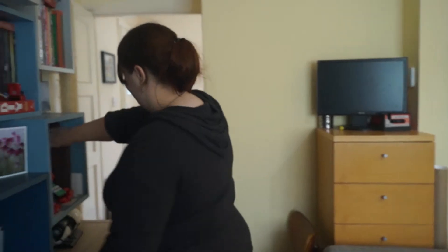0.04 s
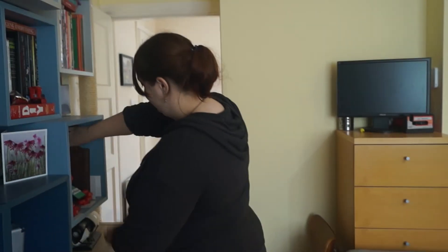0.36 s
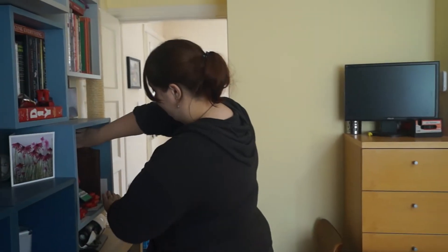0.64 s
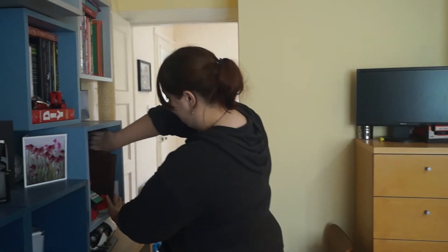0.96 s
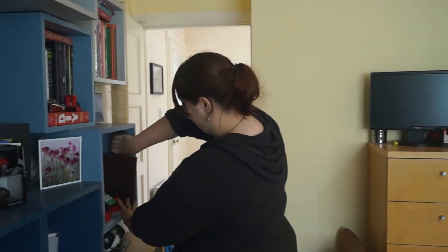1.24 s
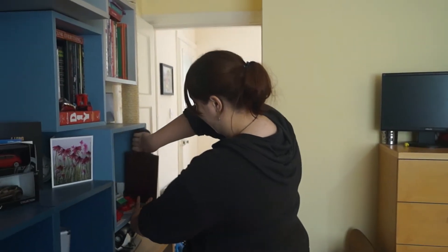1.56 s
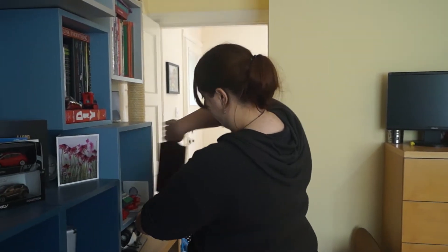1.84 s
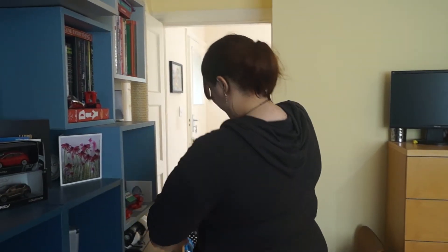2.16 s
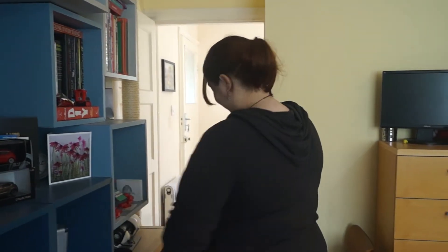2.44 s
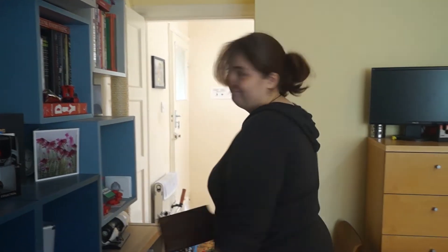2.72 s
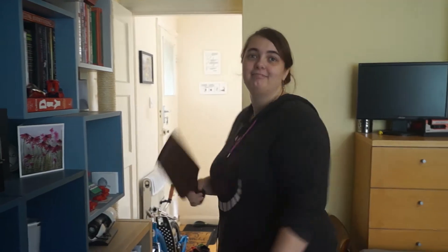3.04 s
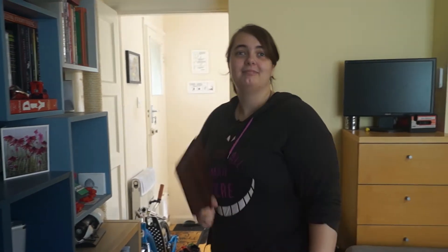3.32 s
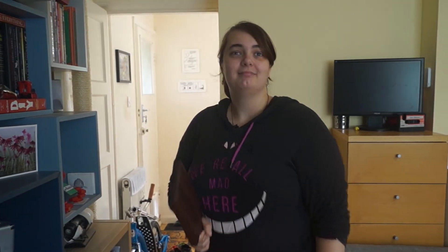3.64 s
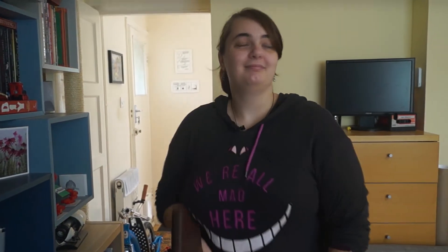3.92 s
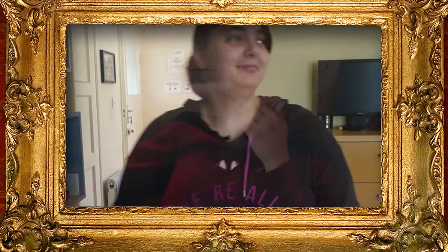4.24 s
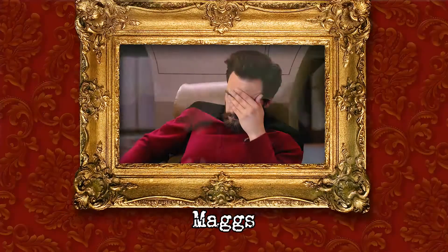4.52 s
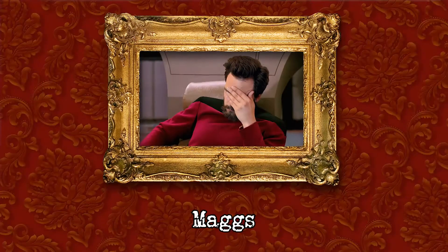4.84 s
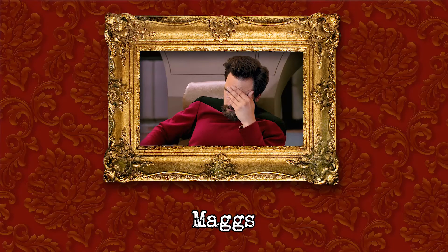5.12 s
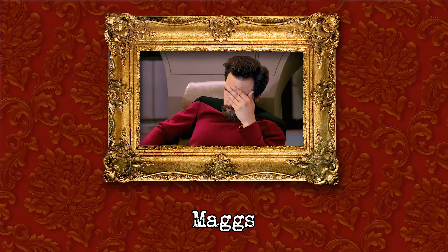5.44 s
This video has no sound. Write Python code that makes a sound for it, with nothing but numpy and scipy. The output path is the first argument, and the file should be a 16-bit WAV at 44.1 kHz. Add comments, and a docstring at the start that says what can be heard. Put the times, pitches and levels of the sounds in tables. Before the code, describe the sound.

A flat wooden box scrapes inside a shelf, tapping and brushing the boards, then gives two louder, chattering knocks. A faint rumble and hiss come up as the box rubs along the side. It slides over the front edge and catches three times, with more knocks and shuffles between. A few faint taps end it. The microphone is a few metres away in a small room.

```python
"""A small room, the microphone a few metres from a shelf. A flat wooden box scrapes deep in the shelf,
taps and brushes the boards, then knocks and chatters as it is worked out. A low rumble and hiss come up,
and the box rubs along the side wall. It slides over the front edge and catches; the same slide sounds
three times, with knocks and shuffles between. A few faint taps come last as the room noise fades away."""
import sys
import numpy as np
from scipy import signal
from scipy.fft import rfft, irfft, next_fast_len
from scipy.io import wavfile
from scipy.ndimage import uniform_filter1d

SR = 44100
rng = np.random.default_rng(int(sys.argv[2]) if len(sys.argv) > 2 else 0)


def bounce(signal):
    """Save signal as a 16-bit WAV file at the path given by the first command-line argument."""
    frames = np.transpose(np.atleast_2d(signal))
    limited = np.clip(frames, -1, 1)
    pcm = np.round(limited * 32767).astype(np.int16)
    wavfile.write(sys.argv[1], SR, pcm)


N = 250430
T = np.arange(N) / SR
REPEAT_S = 1.4  # time between repeats of the slides, catches, shuffles and swells of hiss

# box against shelf: start_s, level_db, contact_ms, crack_relative_db
KNOCKS = [(0.2332, -28.5, 0.88, -14.5), (1.0051, -14.5, 1.51, -16), (1.2869, -16, 1.19, -14.5),
          (1.396, -38.5, 1.6, -13.5), (2.687, -23, 1.29, -13), (3.805, -27.5, 1.4, -17.5),
          (4.087, -20.5, 1.35, -12.5)]
# rebounds within each knock: delay_s, gain_db
CHATTER = [(0, 2.5), (.0041, -4), (.0083, -16)]
# modes of box and board: pitch_hz, level_db, t60_s
WOOD_MODES = [(140.7, -26, 0.34), (260, -7, 0.029), (292.4, -26, .15), (321, -20.5, 0.13),
              (477, -3.5, 0.021), (621, -22, 0.2), (719, 0, 0.019), (1106, -10, 0.062), (1400, 2, .012),
              (2120, -0.5, .012)]
# the boards' dense upper modes: frequency_hz, level_db
CRACK_COLOUR = [(200, -30), (600, 0), (1400, 6.5), (2200, -2), (3200, -19), (6000, -24.5), (15000, -39.5)]
def knocks(crack_rise_s=0.00067, crack_t60_s=0.05, lowest_hz=120):
    """Each knock is a short run of rounded pushes into the wood, with a dry crack on top."""
    out, t = np.zeros(N), T[:SR // 3]
    ring = sum(undb(db - 60 * t / t60) * np.cos(2 * np.pi * hz * t) for hz, db, t60 in WOOD_MODES)
    for s, db, contact_ms, crack_db in KNOCKS:
        push = np.sin(np.pi * np.minimum(t * 1000 / contact_ms, 1)) ** 2
        blow = signal.fftconvolve(ring, push)[:len(t)]
        blow = -blow / np.abs(blow).max()
        for delay, rebound_db in CHATTER:
            add(out, s + delay, undb(db + rebound_db) * blow)
        crack = colour(rng.standard_normal(len(t)), CRACK_COLOUR)
        add(out, s, crack * strike(t, db + crack_db, crack_rise_s, crack_t60_s))
    # small boards radiate little bass
    return signal.sosfilt(signal.butter(2, lowest_hz, "high", fs=SR, output="sos"), out)


# a corner against the side wall: start_s, level_db
GRAZES = [(1.2161, -26), (2.6149, -37), (4.0155, -32)]
# the box's upper resonances: pitch_hz, width_hz, level_db
GRAZE_MODES = [(503, 104, -3), (875, 84, -3.5), (1730, 460, -13.5), (2200, 63, -3)]
def grazes():
    """The corner skips over the wood and sets the box ringing briefly."""
    return sum(contact(s, db, GRAZE_MODES, rise_s=0.0014, t60_s=0.045) for s, db in GRAZES)


# slide over the shelf's front edge: time_s, level_db
SLIDE_LEVEL = [(1.6, -63), (1.63, -53), (1.69, -55.5), (1.75, -48.5), (1.8, -55.5), (1.85, -56),
               (1.88, -87)]
# its spectrum: frequency_hz, level_db
SLIDE_COLOUR = [(150, -50), (400, 7), (700, -8), (1250, -11), (1750, -0.5), (2300, 2.5), (2900, -11.5),
                (4700, -5.5), (6500, -14.5), (12500, -23), (15500, -44)]
# fine hiss of the wood grain: time_s, level_db
GRAIN_LEVEL = [(1.608, -86), (1.616, -65.5), (1.73, -66), (1.835, -55.5), (1.872, -71)]
def slides(first_lag_s=0.00068, last_lag_s=0.001147, echo_gain=0.5):
    """The gap behind the box widens, so its short echo sweeps each slide downwards."""
    slips = friction(12000, 0.8, 1.9)
    lag = np.interp(T, [SLIDE_LEVEL[0][0], SLIDE_LEVEL[-1][0]], [first_lag_s, last_lag_s])
    swept = slips + echo_gain * np.interp(T - lag, T, slips)
    grain = ring_with(friction(12000, 1.9, 1.0), [(11000, 11000, 0)])
    slide = colour(swept, SLIDE_COLOUR) * curve(SLIDE_LEVEL) + grain * curve(GRAIN_LEVEL)
    return repeat(slide, count=3)


# catches at the front edge: start_s, level_db, centre_hz, width_hz
CATCHES = [(1.850, -39.5, 2110, 1210), (2.317, -50, 1900, 400)]
def catches():
    """The box catches with a short ring as each slide ends, then once more, faintly."""
    pair = sum(contact(s, db, [(hz, width, 0)], rise_s=0.0021, t60_s=0.043)
               for s, db, hz, width in CATCHES)
    return repeat(pair, count=3)


# hard scrape deep in the shelf: time_s, scrape_db, groan_db
SCRAPE_LEVELS = [(0, -41.5, -48), (.06, -44, -70), (.09, -42, -46.5), (.155, -43.5, -43.5),
                 (.19, -48, -58.5), (.225, -59.5, -54), (.3, -85, -62.5)]
# its spectrum: frequency_hz, level_db
SCRAPE_COLOUR = [(60, -7), (130, -21), (260, -5), (600, -2.5), (950, -13), (1250, -5.5), (1550, -5.5),
                 (2150, 1), (2700, -10.5), (4800, -13), (5800, -11), (8000, -15), (12000, -28),
                 (15000, -26)]
# board resonances: pitch_hz, width_hz, level_db
GROAN_MODES = [(258, 99, 0), (620, 220, 0), (770, 75, -27)]
def scrape():
    """The box drags hard; under more pressure the board itself groans."""
    levels = np.array(SCRAPE_LEVELS)
    drag = colour(friction(20000, 0.75, 1.0), SCRAPE_COLOUR)
    groan = ring_with(friction(3000, 0.64, 0.89), GROAN_MODES)
    return drag * curve(levels[:, [0, 1]]) + groan * curve(levels[:, [0, 2]])


# dry scuffs in the shelf: start_s, level_db
SCUFFS = [(2.745, -52.5), (2.794, -50)]
# soft bumps under them: start_s, level_db, pitch_hz
BUMPS = [(2.759, -36, 169), (2.798, -32.5, 430), (2.849, -37, 66.4), (2.937, -41, 114)]
def shuffles(bump_cycles=3):
    """Scuffs over padded blows that die in a few cycles, ahead of the second and third slides."""
    out = sum(contact(s, db, [(3050, 5400, 0)], rise_s=0.00051, t60_s=0.23) for s, db in SCUFFS)
    t = T[:SR // 4]
    for s, db, hz in BUMPS:
        add(out, s, np.cos(2 * np.pi * hz * t) * strike(t, db, rise_s=0.00016, t60_s=bump_cycles / hz))
    return repeat(out, count=2)


# light taps on the boards: start_s, level_db, centre_hz
TAPS = [(.154, -40, 900), (.421, -49.5, 597), (0.488, -53.5, 1000), (0.604, -56, 1620), (.811, -52, 1340),
        (5.545, -65, 3000), (5.596, -67, 4000)]
# tiny ticks: start_s, level_db
TICKS = [(.233, -47), (.266, -49), (0.276, -56), (0.369, -49.5), (1.084, -62), (2.669, -56), (4.069, -60),
         (5.47, -66)]
def taps():
    """Light contacts with the boards give dull taps and sharp ticks."""
    dull = sum(contact(s, db, [(hz, 0.96 * hz, 0)], rise_s=0.00037, t60_s=0.055) for s, db, hz in TAPS)
    sharp = sum(contact(s, db, [(6400, 9000, 0)], rise_s=0.00048, t60_s=0.012) for s, db in TICKS)
    return dull + sharp


# strokes on the board: start_s, length_s, level_db
BRUSH_STROKES = [(.2, 0.095, -57.5), (.368, 0.03, -55.5), (.598, 0.13, -51.5), (.803, 0.025, -57.5),
                 (.9, 0.18, -60)]
# their spectrum: frequency_hz, level_db
BRUSH_COLOUR = [(200, -17.5), (450, -11.5), (720, -3.5), (1100, -3), (1350, -3.5), (1650, 3), (2300, -9.5),
                (2900, -17.5), (4200, -13.5), (6000, -24.5), (8500, -23.5), (14000, -36.5)]
def brushing():
    """The box brushes the board with light friction."""
    brush = colour(friction(16000, 1, 2.4), BRUSH_COLOUR)
    return brush * strokes(BRUSH_STROKES, attack_s=0.019, sag_db_per_s=28)


# strokes along the side wall: start_s, length_s, level_db
RUB_STROKES = [(1.138, 0.15, -53.5), (1.415, .48, -54.5), (2.56, .16, -61.5), (2.82, .48, -58),
               (3.955, 0.15, -59), (4.22, 0.42, -56.5)]
# resonances of the rubbing edge: pitch_hz, width_hz, level_db
RUB_MODES = [(1183, 140, 12), (1768, 280, 9), (2067, 123, 11.5), (2323, 490, 6.5), (4440, 320, 4),
             (4995, 810, 3), (10500, 8600, -28.5)]
def edge_rub(drift=0.011):
    """An edge rings as it rubs; its resonances shift a little as the point of contact moves."""
    edge = ring_with(friction(8000, 1.5, 1.2), RUB_MODES)
    warped_time = T + drift * np.cumsum(walk(14)) / SR
    edge = unit(np.interp(warped_time, T, edge, period=N / SR))
    return edge * strokes(RUB_STROKES, attack_s=0.039, sag_db_per_s=7.5)


# decay of the small room: frequency_hz, t60_s
ROOM_DECAY = [(150, 0.37), (500, 0.18), (2000, 0.53), (10000, 0.15)]
def room(x, wet_db=-17, first_echo_s=0.0099):
    """Diffuse wall echoes reach the microphone after the direct sound, decaying in octave bands."""
    t = T[:SR // 2]
    tail = np.zeros(len(t))
    for hz in 125 * 2. ** np.arange(8):
        band = resonate(rng.standard_normal(len(t)), hz, hz / 2)
        tail += band * undb(-60 * t / on_log_axis(ROOM_DECAY, hz))
    tail *= t > first_echo_s
    return x + undb(wet_db) * signal.fftconvolve(x, tail / np.linalg.norm(tail))[:N]


# one swell of hiss in the room: time_s, level_db
HISS_SWELL = [(1.521, -63), (1.689, -58.5), (2.32, -59), (2.46, -56.5)]
# its spectrum: frequency_hz, level_db
HISS_COLOUR = [(20, -6.5), (45, -6.5), (80, -20), (130, -18), (220, -10), (380, -2), (540, -8.5), (760, -8),
               (1260, -16.5), (1950, -17), (2900, -19.5), (4000, -28.5), (7000, -22), (11000, -28.5),
               (13800, -27), (15500, -49)]
def hiss_and_rumble(start_s=1.064, rise_s=0.22, end_s=5.46, fall_s=0.4, rumble_db=-68, hum_db=-62):
    """A regularly swelling hiss, a low rumble and a wavering hum fade in and out together."""
    s, db = np.transpose(HISS_SWELL)
    hiss = colour(rng.standard_normal(N), HISS_COLOUR) * undb(np.interp(T, s, db, period=REPEAT_S))
    rumble = ring_with(rng.standard_normal(N), [(41, 30, 0)]) * undb(rumble_db)
    hum_hz = 42 * (1 + 0.0596 * walk(11))
    hum = unit(np.sin(2 * np.pi * np.cumsum(hum_hz) / SR)) * undb(hum_db)
    fade = np.clip(np.minimum((T - start_s) / rise_s, (end_s - T) / fall_s), 0, 1)
    return fade * (hiss + rumble + hum)


# room tone at the microphone: time_s, level_db
TONE_LEVEL = [(0, -58.5), (1.2, -66), (5.2, -67), (5.45, -72.5), (5.68, -78.5)]
# its spectrum: frequency_hz, level_db
TONE_COLOUR = [(25, 7.5), (45, 3), (85, -4.5), (130, -5.5), (260, -5.5), (450, -8.5), (750, -11),
               (1700, -16.5), (3000, -22.5), (5000, -20.5), (9000, -32), (15000, -38)]
def room_tone():
    """Quiet, bass-heavy noise that settles early and sinks away at the end."""
    return colour(rng.standard_normal(N), TONE_COLOUR) * curve(TONE_LEVEL)


def friction(slips_per_s, spread_db, judder_db):
    """Dense tiny slips of uneven size; the hand's pressure judders."""
    slips = (rng.random(N) < slips_per_s / SR) * rng.standard_normal(N)
    return unit(slips * undb(spread_db * rng.standard_normal(N) + judder_db * walk(70)))


def strokes(rows, attack_s, sag_db_per_s, release_t60_s=0.25):
    """Gain of hand strokes: each sets in, slackens as it goes and lets go."""
    gain = np.zeros(N)
    for s, length, db in rows:
        t = np.maximum(T - s, 0)
        sag_db = sag_db_per_s * np.minimum(t, length)
        release_db = 60 * np.maximum(t - length, 0) / release_t60_s
        gain += np.minimum(t / attack_s, 1) * undb(db - sag_db - release_db)
    return gain


def contact(s, db, modes, rise_s, t60_s):
    """A brief gritty burst at time s, through (centre_hz, width_hz, level_db) resonances."""
    out, t = np.zeros(N), T[:SR // 4]
    grit = ring_with(rng.standard_normal(len(t)), modes)
    add(out, s, grit * strike(t, db, rise_s, t60_s))
    return out


def strike(t, db, rise_s, t60_s):
    """Gain of a blow: a quick rise and an exponential decay."""
    return (1 - np.exp(-t / rise_s)) * undb(db - 60 * t / t60_s)


def ring_with(x, modes):
    """Pass x through steep (centre_hz, width_hz, level_db) resonances; rms 1."""
    return unit(sum(undb(db) * resonate(resonate(x, hz, width), hz, width) for hz, width, db in modes))


def resonate(x, hz, width):
    """Two-pole band-pass, gain 1 at the centre."""
    g, k = np.tan(np.pi * hz / SR), width / hz
    return signal.lfilter([g * k, 0, -g * k], [1 + g * k + g * g, 2 * (g * g - 1), 1 - g * k + g * g], x)


def colour(x, points):
    """Give x a (frequency_hz, level_db) spectral density; rms 1."""
    size = next_fast_len(len(x))
    gain = undb(on_log_axis(points, np.fft.rfftfreq(size, 1 / SR)))
    return unit(irfft(rfft(x, size) * gain, size)[:len(x)])


def on_log_axis(points, hz):
    """Read (frequency_hz, value) points on a log-frequency axis."""
    f, value = np.transpose(points)
    return np.interp(np.log(hz + 1), np.log(f), value)


def walk(rate_hz):
    """Smooth random wander; rms 1."""
    hold = int(SR / rate_hz)
    steps = rng.standard_normal(N // hold + 1)[np.arange(N) // hold]
    return unit(uniform_filter1d(steps, hold))


def curve(rows):
    """Gain from (time_s, level_db) rows, silent outside them."""
    s, db = np.transpose(rows)
    return undb(np.interp(T, s, db, left=-np.inf, right=-np.inf))


def repeat(x, count):
    """Play x count times, REPEAT_S apart."""
    out = np.zeros(N)
    for k in range(count):
        add(out, k * REPEAT_S, x)
    return out


def add(out, s, x):
    """Mix x into out from time s."""
    i = int(s * SR)
    out[i:i + len(x)] += x[:N - i]


def undb(db):
    """Decibels to gain."""
    return 10 ** (np.asarray(db) / 20)


def unit(x):
    """Scale to rms 1."""
    return x / np.sqrt(np.mean(x ** 2))


def scene():
    """The box heard across the room at one microphone, over the background."""
    box = knocks() + grazes() + taps() + catches() + shuffles()
    box += scrape() + brushing() + edge_rub() + slides()
    return (room(box) + room_tone() + hiss_and_rumble())[None]


def record(dry, top_hz=15400):
    """The recorder cuts the highest treble steeply."""
    return signal.sosfilt(signal.ellip(8, .2, 70, top_hz, fs=SR, output="sos"), dry)


dry = scene()
out = record(dry)
bounce(out)
```